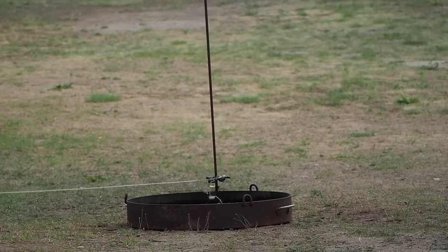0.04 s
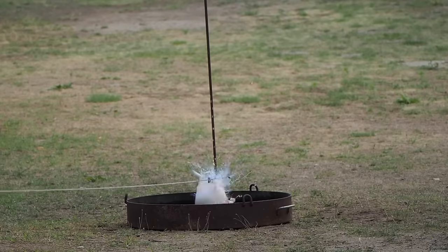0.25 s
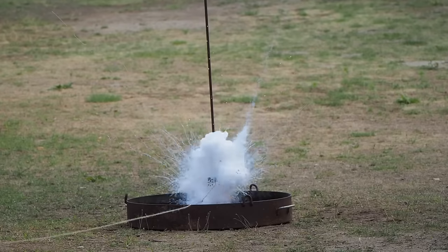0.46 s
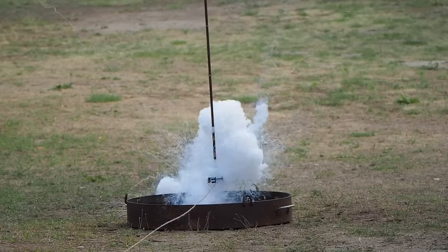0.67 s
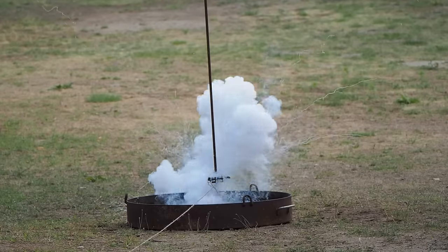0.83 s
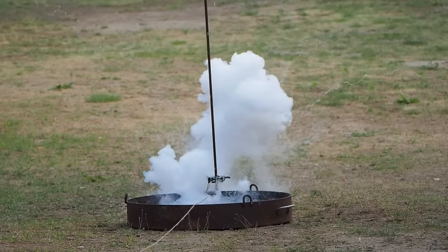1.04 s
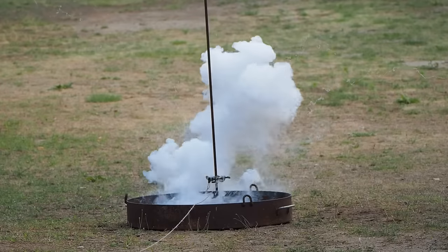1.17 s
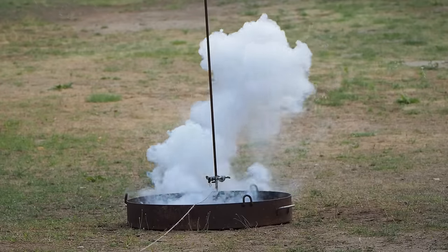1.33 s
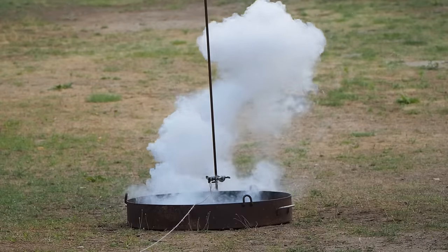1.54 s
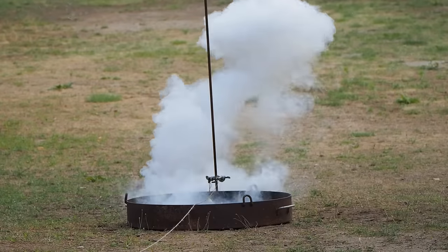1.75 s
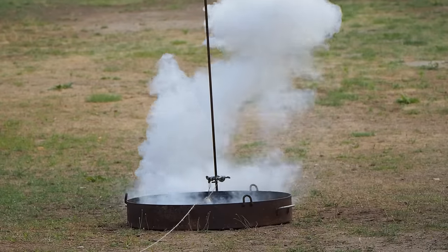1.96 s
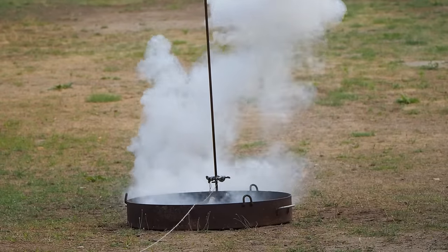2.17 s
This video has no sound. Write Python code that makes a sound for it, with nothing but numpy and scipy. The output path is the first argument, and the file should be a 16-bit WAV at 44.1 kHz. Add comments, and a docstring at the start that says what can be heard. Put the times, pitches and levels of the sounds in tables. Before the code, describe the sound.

An explosion in a steel basin of water gives two quick clusters of dull bangs at about 0.2 and 0.3 seconds, briefly ringing the metal. Sharp cracks follow from 0.4 to 0.6 seconds as spray patters down, with two more around 1 second. Ever smaller pops and droplet ticks continue until about 2.2 seconds, while a soft fizz fades into faint outdoor air.

```python
"""Over faint outdoor air come two clusters of dull blasts: a reactive metal explodes in a wide steel
basin of water on an open field, and the pressure pulses set the basin ringing in its normal modes.
Flung bits of metal then burst, sending out shock waves heard as sharp cracks and ever smaller pops.
Each report scatters between the basin walls and decays over the field, while spray patters down
and the water fizzes."""
import sys
import numpy as np
from scipy import signal
from scipy.fft import rfft, irfft
from scipy.io import wavfile

SR = 44100
rng = np.random.default_rng(int(sys.argv[2]) if len(sys.argv) > 2 else 0)


def bounce(signal):
    """Save signal as a 16-bit WAV file at the path given by the first command-line argument."""
    frames = np.transpose(np.atleast_2d(signal))
    limited = np.clip(frames, -1, 1)
    pcm = np.round(limited * 32767).astype(np.int16)
    wavfile.write(sys.argv[1], SR, pcm)


N = 97020
TIME = np.arange(N) / SR
EDGES = 22 * 2 ** (np.arange(30) / 3)   # third-octave bands [Hz]
CENTRES = np.sqrt(EDGES[1:] * EDGES[:-1])

# spectral shapes of the noisy sources: (frequency [Hz], relative spectral density [dB])
AIR_SPECTRUM = [(25, -7), (50, 2), (100, 3.5), (200, -1), (400, -6.5), (650, -8), (950, -2.5),
                (1400, -11.5), (3000, -13), (6000, -20), (16000, -27)]
FIZZ_SPECTRUM = [(1000, -40), (3000, 2), (6500, 0.5), (8700, 9.5), (11000, 1.5), (16000, -22)]
PATTER_SPECTRUM = [(500, -5.5), (2000, 3.5), (4000, 7.5), (6500, -7), (9000, -7), (15000, -26)]
CRACK_SPECTRUM = [(50, -18.5), (200, -9.5), (500, -7.5), (1000, 0), (1400, -6), (2300, -1.5), (4300, -2),
                  (6400, -8), (8500, -4), (12000, -19.5), (16000, -41)]
SPRAY_SPECTRUM = [(300, -45), (1000, -11.5), (1800, 8.5), (3000, 3.5), (4500, 5.5), (6400, -7.5),
                  (8300, -0.5), (11000, -18.5), (16000, -54)]
BOOM_SPECTRUM = [(40, -105), (100, -19), (190, -13.5), (400, -5.5), (630, 3.5), (950, -6), (1300, -13.5),
                 (2500, -25), (8000, -55)]
# left-right likeness of sound in the basin and over the field: (frequency [Hz], coherence [0-1])
NEAR_COHERENCE = [(100, .99), (700, 1), (1500, 1), (4000, 0.6), (10000, 0.1)]
FAR_COHERENCE = [(40, 0.62), (150, 0.91), (700, 0.86), (1300, 0.62), (3000, 0.083), (9000, 0.13)]
# reverberation of the field: (frequency [Hz], T60 [s])
FIELD_DECAY = [(100, 1), (300, 0.83), (700, 0.36), (2500, 0.33), (8000, 0.3), (15000, 0.37)]
# normal modes of the steel basin: (frequency [Hz], level [dB], T60 [s])
BASIN_MODES = [(171.7, -34.5, .6), (287, -38, 0.52), (362, -31.5, 0.99), (415, -21.5, 0.4),
               (446.4, -34, 0.14), (534, -52, 0.17), (552, -37, 0.55), (615, -15.5, 0.27),
               (649, -31.5, 0.39), (768, -28, 0.46), (824, -35.5, 0.085), (925, -29, 0.2),
               (1037, -20, 0.36), (1476, -39, 0.3), (2050, -29, 0.4), (2590, -31, 0.34),
               (2798, -19.5, 0.12), (3450, -31, 0.64), (4300, -31, 0.11), (4400, -17, 0.1),
               (5240, -26, 0.15)]
# landing droplets: (time [s], level [dB])
DROPLETS = [(.7759, -37), (.8158, -37), (.9136, -37), (1.2029, -41), (1.3571, -35), (1.3985, -37),
            (1.4165, -33), (1.7572, -38), (1.9438, -39)]
# bursting bits of metal: (time [s], reverberant level [dB], shock level [dB], shock period [s],
# bass gain [dB], treble gain [dB], emphasised frequency [Hz])
METAL_BURSTS = [(0.407, -15.5, 1, 0.00018, -13, 3.5, 4640), (.4748, -28, -14, .00035, -3, 0, 2800),
                (.4800, -13.5, -1, 0.00043, -0.5, -2, 2100), (0.5692, -20, -3.5, 0.00033, 5, 1, 2150),
                (.6764, -36, -21, .00025, -4, -6, 4500), (0.9401, -22.5, -12, 0.00026, -2, 8.5, 2360),
                (1.022, -20, -7.5, 0.00043, -2, 0, 2630), (1.2315, -32, -28, 0.00006, -4, 7, 4940),
                (1.2726, -40.5, -26, 0.00014, -16, 9, 4950), (1.5863, -36.5, -25.5, 0.0001, -36, 22, 4430),
                (1.606, -42.5, -36, 0.000088, -37, -1, 8600), (1.6764, -44, -36, 0.00011, -18, 20, 8800),
                (1.683, -51, -29, 0.000087, -12, 6, 8600), (2.01, -47, -35, 0.00007, -16, 13, 8100),
                (2.173, -44, -52, 0.00029, -14, 8.5, 2330)]
# gas blasts: (time [s], pulse level [dB], boom level [dB], spray level [dB])
GAS_BLASTS = [(.2031, -15, -19, -19), (.2064, -10.5, -16, -20), (.2085, -5, -15, -39),
              (.2263, -4.5, -21.5, -33), (.3084, -13.5, -19.5, -23.5), (.3176, -8.5, -19, -16.5),
              (.3252, -9, -26, -17.5), (.3284, -10, -20.5, -26), (.3988, -19, -27, -23)]

AIR_DB = -53
FIZZ_DB, FIZZ_FADE_DB_PER_S = -45, 10.5
PATTER_DB, PATTER_PEAK_S, PATTER_SPREAD_S = -46.5, 0.53, 0.37
ONSET_S, ONSET_DB, SCATTER_S = 0.0002, -7.5, 0.002
FAR_DB, FAR_T60_S = -21, 0.91
WALL_ECHO_S, WALL_ECHO_DB = 0.0044, -9
SHOCK_BAND_HZ, SHOCK_LOSS_DB_PER_PERIOD = (204, 9700), 15
TICK_SCATTER_DB, TICK_PERIOD_S = -15, 0.00013
BASS_HZ, TREBLE_HZ, PITCH_OCTAVES, PITCH_LIFT_DB = 1550, 3300, 0.2, 7
CRACK_CORNER_HZ, CRACK_STRIKE_DB, CRACK_TAIL_DB = 1960, 2.5, -6
BLAST_HZ, BLAST_RISE_S, BLAST_TAIL_DB = 609, 0.00072, -4.5
BLAST_CORNER_HZ, BLAST_LOW_CUT_HZ = 2220, 149


def from_db(db):
    """Amplitude ratio: tenfold for every 20 dB."""
    return 10 ** (np.asarray(db) / 20)


def at_hz(points, hz):
    """Interpolation on a logarithmic frequency axis."""
    frequencies, values = np.transpose(points)
    return np.interp(np.log(hz), np.log(frequencies), values)


def band_gains(spectrum):
    """Band power is density times bandwidth; the gains are scaled to a total power of 1."""
    gains = from_db(at_hz(spectrum, CENTRES)) * np.sqrt(CENTRES)
    return gains / np.linalg.norm(gains)


def impulses(times, sizes):
    """Ideal impulses, one sample each."""
    out = np.zeros(N)
    np.add.at(out, np.clip(np.round(times * SR).astype(int), 0, N - 1), sizes)
    return out


def noise_bands(coherence):
    """Partly coherent stereo noise from a sum and a difference signal: bands x 2 x N, rms 1 each."""
    white, out = rng.standard_normal((2, 2, N)), []
    for k, hz in enumerate(CENTRES):
        bandpass = signal.butter(2, EDGES[k:k + 2], "band", fs=SR, output="sos")
        band = signal.sosfilt(bandpass, white[k % 2])
        mid, side = band / band.std(axis=1, keepdims=True)
        alike = np.clip(at_hz(coherence, hz), 0, 1)
        out.append(np.sqrt((1 + alike) / 2) * mid + np.sqrt((1 - alike) / 2) * np.array([side, -side]))
    return np.array(out)


def outdoor_air():
    """Stationary noise, strongest in the bass, forms the ambient floor."""
    return from_db(AIR_DB) * np.tensordot(band_gains(AIR_SPECTRUM), noise_bands(FAR_COHERENCE), 1)


def shot_noise(spectrum, spread_db, per_s):
    """A Poisson process: independent clicks of uneven size merge into a crackle of rms 1."""
    sizes = from_db(spread_db * np.minimum(rng.exponential(1, (2, N)), 4))
    signs = rng.choice([-1, 1], (2, N))
    occurs = rng.random((2, N)) < per_s / SR
    hz = np.maximum(np.fft.rfftfreq(N, 1 / SR), 1)
    response = from_db(at_hz(spectrum, hz)) * np.minimum(hz / spectrum[0][0], 1)
    out = irfft(rfft(sizes * signs * occurs) * response, N)
    return out / out.std()


def fizz_and_patter():
    """Shot noise from the first blast on: the fizz decays exponentially, the shower swells and ebbs."""
    age = TIME - GAS_BLASTS[0][0]
    fizz = from_db(FIZZ_DB - FIZZ_FADE_DB_PER_S * age) * shot_noise(FIZZ_SPECTRUM, 5.5, per_s=2400)
    shower = np.exp(-0.5 * ((TIME - PATTER_PEAK_S) / PATTER_SPREAD_S) ** 2)
    patter = from_db(PATTER_DB) * shower * shot_noise(PATTER_SPECTRUM, 3.5, per_s=4000)
    return (age > 0) * (fizz + patter)


def decay(power, t60):
    """Exponential energy decay: each input of power falls by 60 dB in t60 seconds."""
    return signal.lfilter([1], [1, -np.exp(-np.log(1e6) / (t60 * SR))], power + 1e-18)


def reverberation(times, gains, tail_db, near, far):
    """Incoherent reflections add in power, in the basin and over the field; gains: events x bands."""
    out = np.zeros((2, N))
    onset_pole, pole = np.exp(-1 / (ONSET_S * SR)), np.exp(-1 / (SCATTER_S * SR))
    for k, hz in enumerate(CENTRES):
        power = impulses(times, gains[:, k] ** 2) + 1e-18
        onset = from_db(ONSET_DB) ** 2 * signal.lfilter([1], [1, -onset_pole], power)
        # scattering between the walls peaks SCATTER_S after each report
        scatter = signal.lfilter([np.e * (1 - pole)], [1, -2 * pole, pole ** 2], power)
        escaped = from_db(tail_db) ** 2 * signal.lfilter([1 - pole], [1, -pole], power)
        tail = decay(escaped, at_hz(FIELD_DECAY, hz)) + from_db(FAR_DB) ** 2 * decay(escaped, FAR_T60_S)
        out += np.sqrt(onset + scatter) * near[k] + np.sqrt(tail) * far[k]
    return out


def wall_echo(sound):
    """Specular reflection: the far wall of the basin adds one delayed, weaker copy."""
    lag, out = int(WALL_ECHO_S * SR), sound.copy()
    out[..., lag:] += from_db(WALL_ECHO_DB) * sound[..., :-lag]
    return out


def basin_ring(times, db, coupling):
    """Modal resonance: the steel rings as damped sinusoids, each driven in proportion to coupling(Hz)."""
    out = np.zeros(N)
    for hz, mode_db, t60 in BASIN_MODES:
        radius, angle = np.exp(-np.log(1000) / (t60 * SR)), 2 * np.pi * hz / SR
        strikes = impulses(times, coupling(hz) * from_db(db + mode_db + rng.normal(0, 1, len(times))))
        resonator = [1, -2 * radius * np.cos(angle), radius ** 2]
        out -= signal.lfilter([0, np.sin(angle)], resonator, strikes + 1e-18)
    return out


def shock_waves(times, db, periods):
    """Heavily damped pressure swings: a steep spike, a weaker swing back, then the wall echo."""
    out = np.zeros(N + SR)
    for time, level_db, period in zip(times, db, periods):
        cycles = TIME[:SR // 100] / period
        wave = -np.sin(2 * np.pi * cycles) * from_db(-SHOCK_LOSS_DB_PER_PERIOD * cycles)
        start = int(time * SR)
        out[start:start + len(wave)] += from_db(level_db) * wave / np.abs(wave).max()
    bandpass = signal.butter(2, SHOCK_BAND_HZ, "band", fs=SR, output="sos")
    return wall_echo(signal.sosfilt(bandpass, out[:N]))


def droplet_ticks(near, far):
    """Impact noise: each landing droplet radiates a brief, and therefore bright, pulse."""
    times, db = np.transpose(DROPLETS)
    pulses = shock_waves(times, db, np.full(len(times), TICK_PERIOD_S))
    snap = signal.sosfilt(signal.butter(2, 3000, "high", fs=SR, output="sos"), pulses)
    gains = np.outer(from_db(db + TICK_SCATTER_DB), band_gains(FIZZ_SPECTRUM))
    return snap + reverberation(times, gains, CRACK_TAIL_DB, near, far)


def metal_cracks(near, far):
    """Shock excitation: each bursting bit favours the high modes and reverberates in its own colour."""
    times, db, shock_db, periods, bass_db, treble_db, pitch_hz = np.transpose(METAL_BURSTS)
    bass = np.clip(np.log2(BASS_HZ / CENTRES) / 2, 0, 1)
    treble = np.clip(np.log2(CENTRES / TREBLE_HZ) / 2, 0, 1)
    pitch = np.exp(-(np.log2(CENTRES / pitch_hz[:, None]) / PITCH_OCTAVES) ** 2)
    colour_db = np.outer(bass_db, bass) + np.outer(treble_db, treble) + PITCH_LIFT_DB * pitch
    colour = band_gains(CRACK_SPECTRUM) * from_db(colour_db)
    gains = colour / np.linalg.norm(colour, axis=1, keepdims=True) * from_db(db)[:, None]
    ring = basin_ring(times, db + CRACK_STRIKE_DB, lambda hz: 1 / np.hypot(1, CRACK_CORNER_HZ / hz))
    diffuse = reverberation(times, gains, CRACK_TAIL_DB, near, far)
    return shock_waves(times, shock_db, periods) + ring + diffuse


def gas_blasts(near, far):
    """Pulse excitation: a slower pressure swing favours the low modes, amid a boom and a burst of spray."""
    times, db, boom_db, spray_db = np.transpose(GAS_BLASTS)
    age = TIME[:SR // 50]
    swing = -np.sin(2 * np.pi * BLAST_HZ * age) * age / BLAST_RISE_S * np.exp(1 - age / BLAST_RISE_S)
    pulses = signal.oaconvolve(impulses(times, from_db(db)), swing)[:N]
    ring = basin_ring(times, db, lambda hz: 1 / np.hypot(1, hz / BLAST_CORNER_HZ))
    boom = np.outer(from_db(boom_db), band_gains(BOOM_SPECTRUM))
    spray = np.outer(from_db(spray_db), band_gains(SPRAY_SPECTRUM))
    diffuse = reverberation(np.tile(times, 2), np.vstack([boom, spray]), BLAST_TAIL_DB, near, far)
    low_cut = signal.butter(2, BLAST_LOW_CUT_HZ, "high", fs=SR, output="sos")
    return signal.sosfilt(low_cut, pulses + ring) + diffuse


def scene():
    """Superposition: the pressures of air, reports and water add."""
    near, far = noise_bands(NEAR_COHERENCE), noise_bands(FAR_COHERENCE)
    air = outdoor_air()
    # reversed noise keeps the tails of the cracks uncorrelated with those of the blasts
    reports = gas_blasts(near, far) + metal_cracks(near, far[..., ::-1])
    return air + fizz_and_patter() + droplet_ticks(near, far) + reports


def record(dry):
    """Overload clips the highest peaks; a steep low-pass removes the top of the treble."""
    lowpass = signal.cheby2(16, 80, 16900, fs=SR, output="sos")
    return signal.sosfilt(lowpass, np.clip(dry, -1, 1))


dry = scene()
out = record(dry)
bounce(out)
```